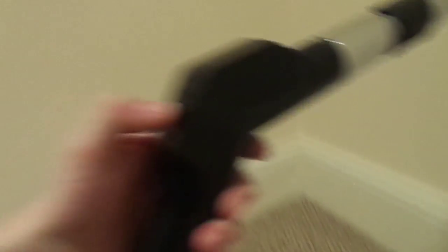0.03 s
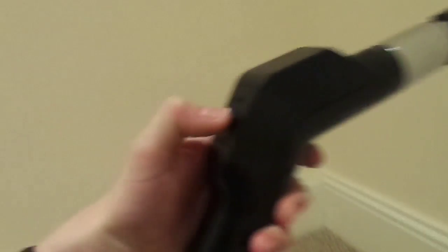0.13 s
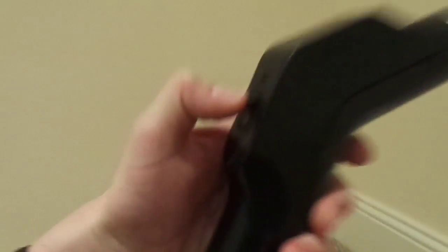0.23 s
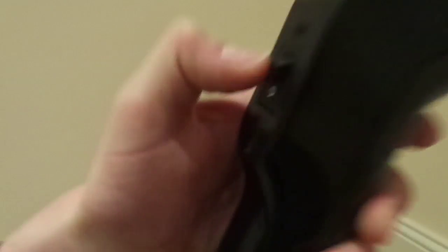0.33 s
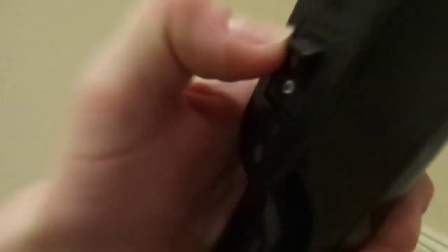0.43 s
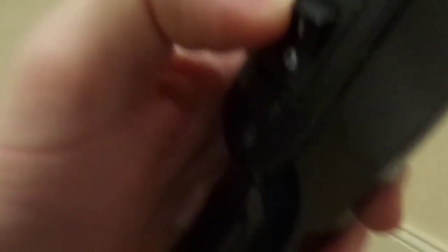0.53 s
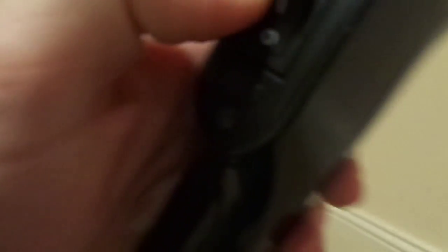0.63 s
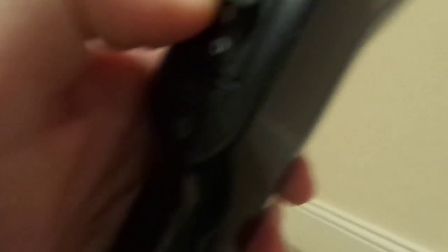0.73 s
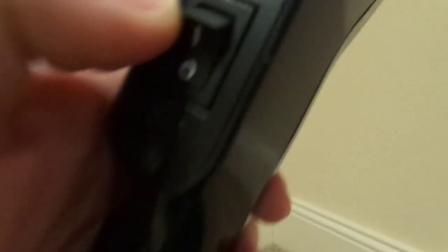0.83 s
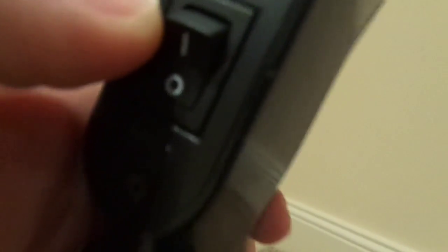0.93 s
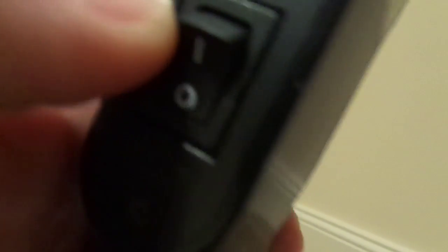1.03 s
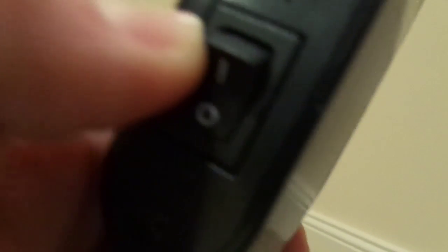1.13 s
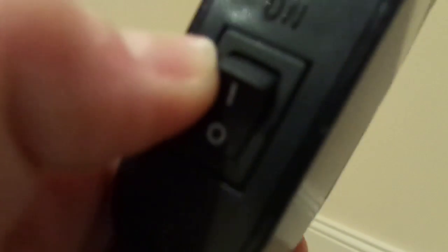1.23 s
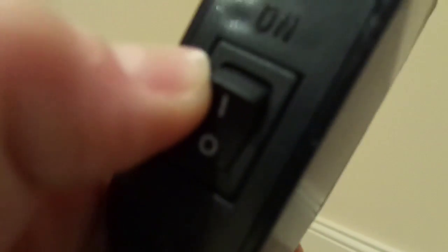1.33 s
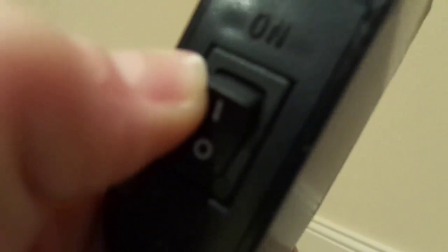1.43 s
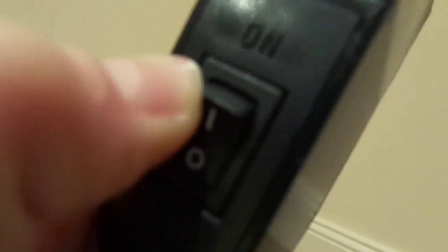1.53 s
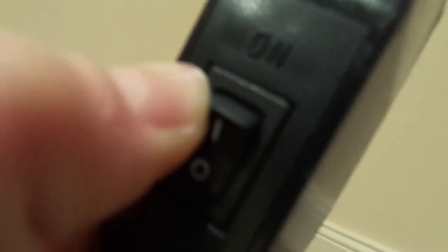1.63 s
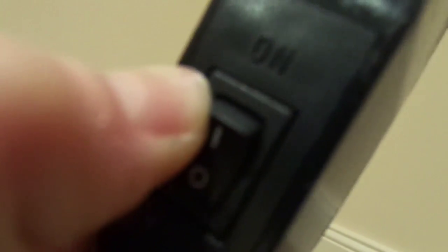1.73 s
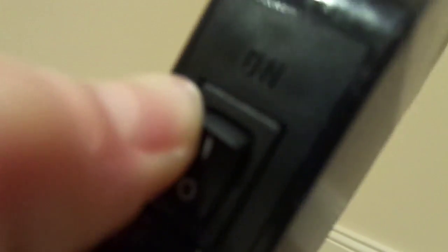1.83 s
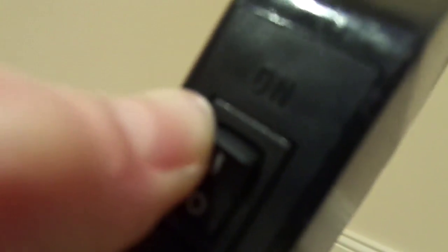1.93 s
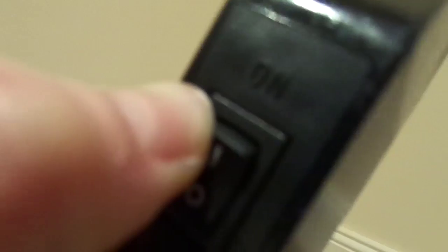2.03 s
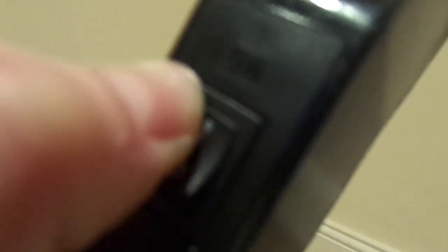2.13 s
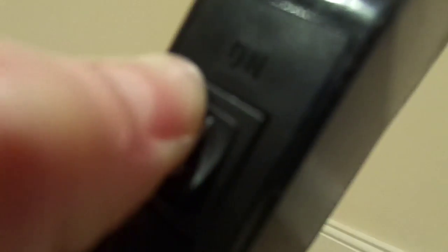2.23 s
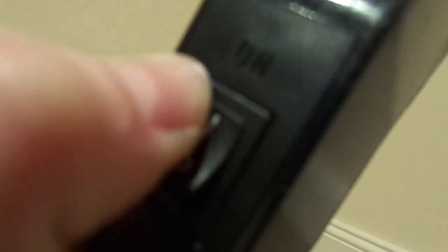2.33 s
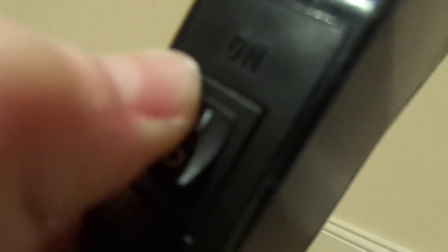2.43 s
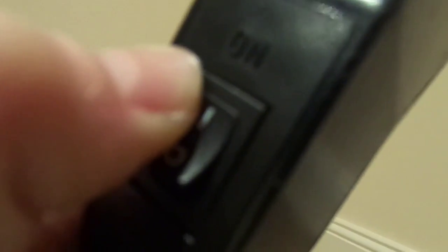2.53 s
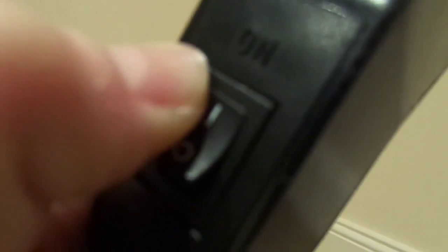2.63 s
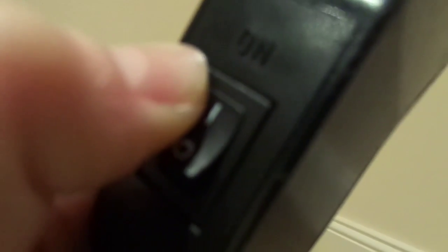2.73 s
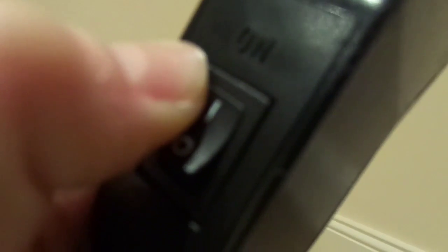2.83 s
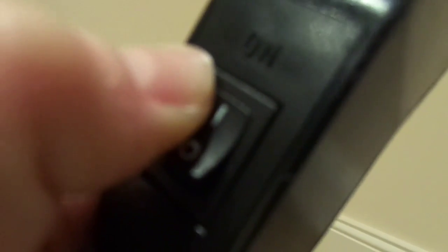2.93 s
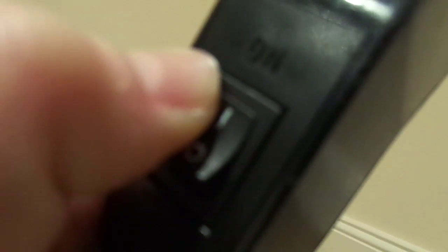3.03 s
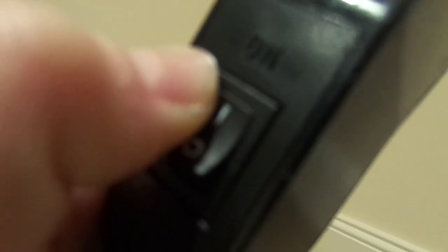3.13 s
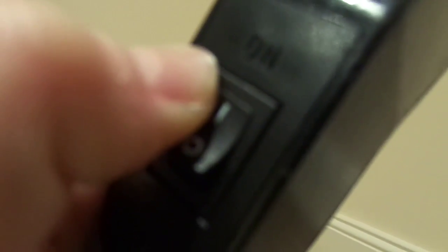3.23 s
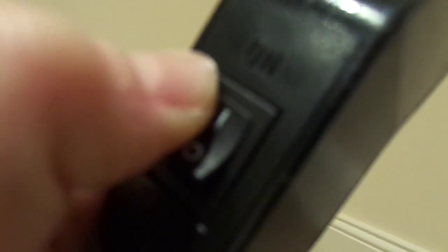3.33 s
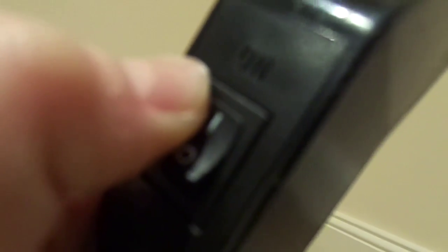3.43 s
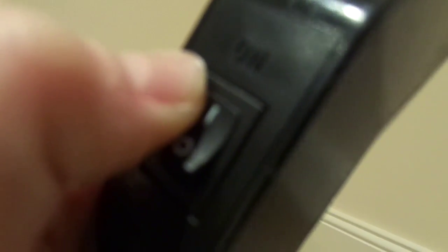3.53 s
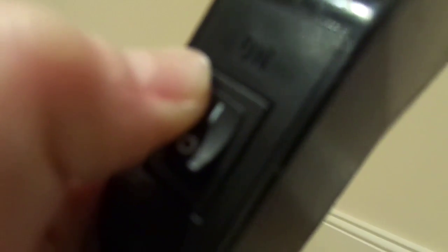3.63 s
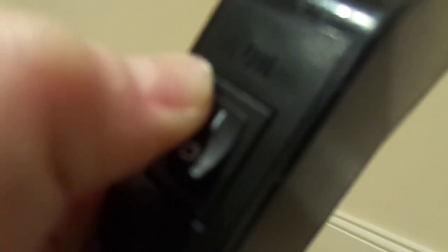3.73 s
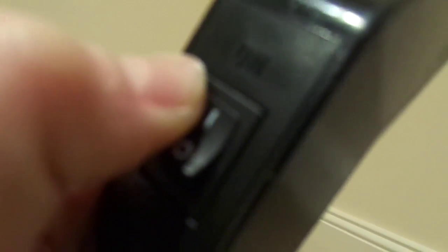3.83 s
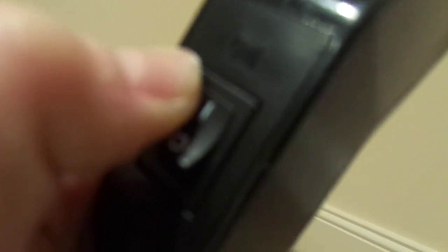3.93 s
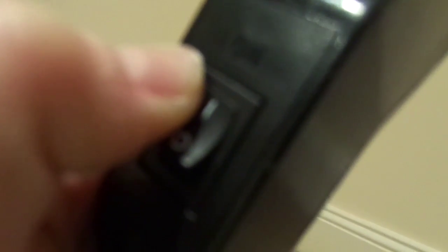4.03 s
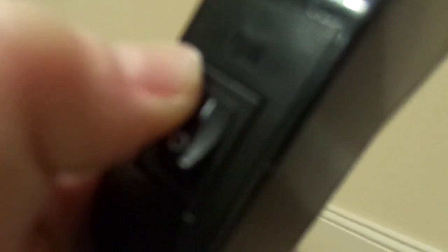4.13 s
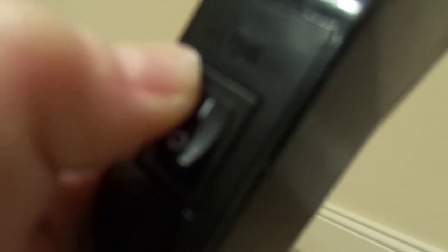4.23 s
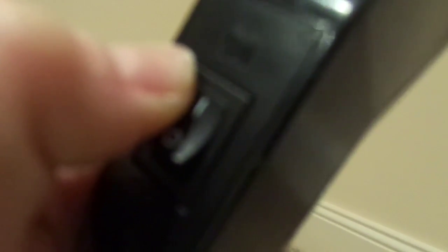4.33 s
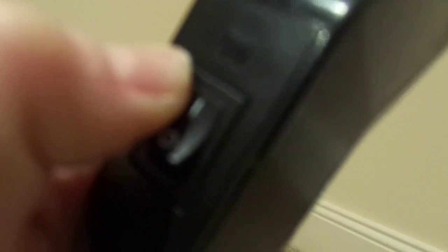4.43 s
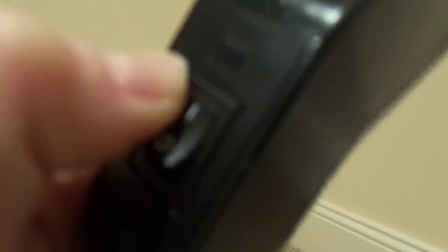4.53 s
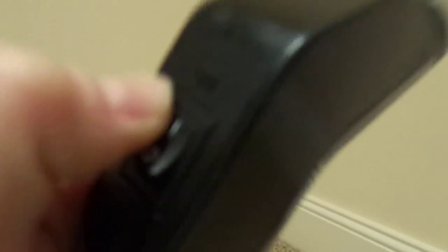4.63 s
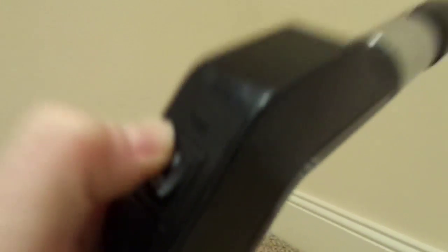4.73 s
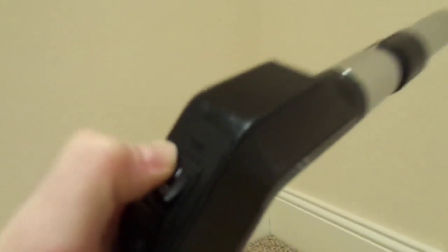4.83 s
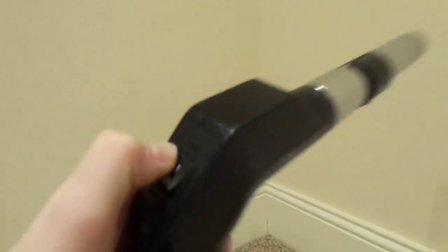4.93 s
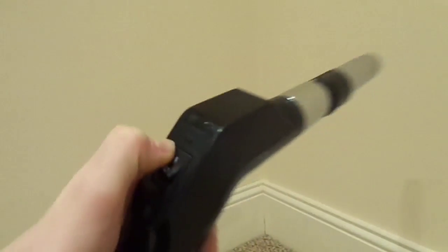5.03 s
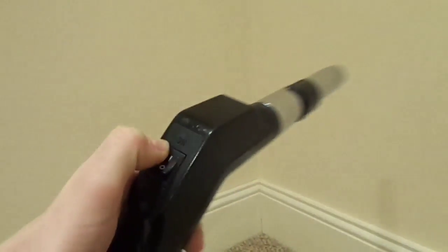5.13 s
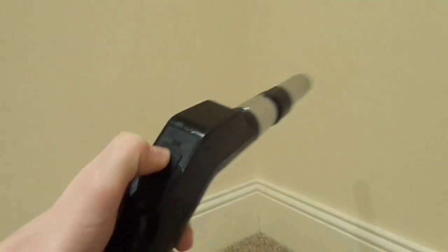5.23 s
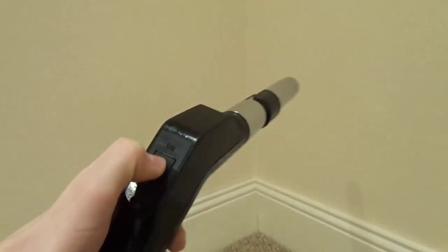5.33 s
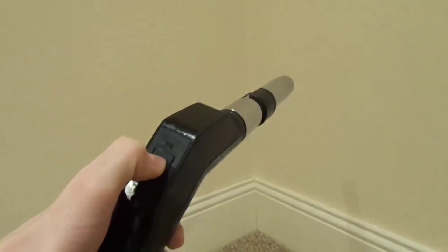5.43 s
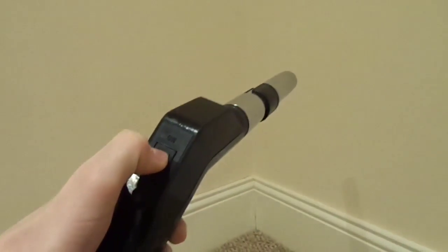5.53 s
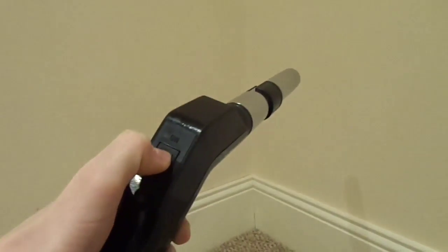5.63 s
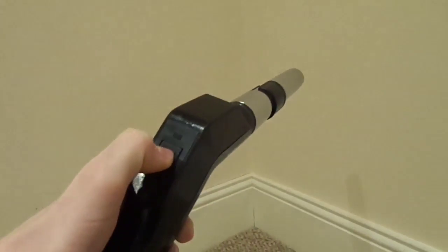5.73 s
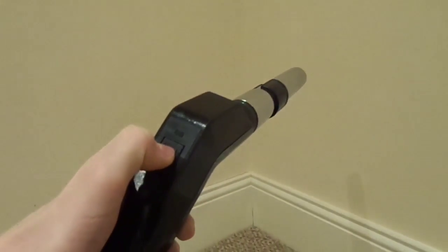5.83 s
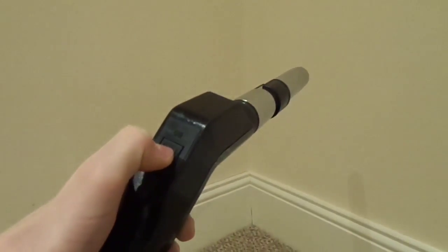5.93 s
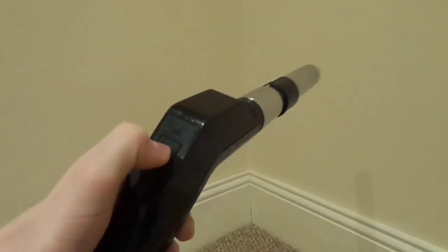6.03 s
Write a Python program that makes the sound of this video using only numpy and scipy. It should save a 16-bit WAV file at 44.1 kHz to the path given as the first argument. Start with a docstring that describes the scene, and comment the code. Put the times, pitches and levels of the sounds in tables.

```python
"""You hear a hose drag over carpet in a quiet room, a creaking plastic handle, a rocker switch, then rushing air.
A hand turns the handle of a central vacuum hose: the drag is noise, and small slips ring the shell.
The switch snaps with short noise bursts; the far-off motor spins up and air rushes into the wand.
The rush is noise coloured by hose modes, with near echoes.
The echoes shorten when the handle is moved away from the microphone."""
import sys
import numpy as np
from scipy import signal
from scipy.fft import rfft, irfft, next_fast_len
from scipy.io import wavfile
from scipy.ndimage import map_coordinates

SR = 44100
rng = np.random.default_rng(int(sys.argv[2]) if len(sys.argv) > 2 else 0)


def materialize(psi):
    """Save the field psi as 16-bit PCM at rate SR to the path in sys.argv[1].

    A 1-D psi becomes a single channel; in a 2-D psi each row is a channel.
    """
    bounded = np.clip(np.atleast_2d(psi).T, -1, 1)
    quanta = np.round(bounded * 32767).astype(np.int16)
    wavfile.write(sys.argv[1], SR, quanta)


N = 267951
SIZE = next_fast_len(N + SR // 2)   # room for filter tails
HZ = np.maximum(np.arange(SIZE // 2 + 1) * SR / SIZE, 1)   # frequency grid of the filters
TAIL_T60_S = 0.39   # time in which the room's sound falls by 60 dB


def air():
    """Turbulence at the inlet rings in the hose; nearby surfaces add delayed copies that comb the sound."""
    # noise spectra of the air layers: [f/Hz, level per Hz/dB]
    rush_spectrum = [(88, -33), (150, -10), (278, 0), (470, -7.5), (927, -1), (1120, -4), (1240, 1.5),
                     (1770, -4.5), (2010, -4), (4140, -2), (6000, -29), (7800, -20.5), (13200, -120)]
    hiss_spectrum = [(2940, -14), (5000, -2.5), (9750, -1.5), (13300, -0.5), (14800, -2.5)]
    rumble_spectrum = [(13, -52), (22, -27), (86, 11.5), (108, 11), (156, -1), (190, 4.5), (250, -25),
                       (420, -120)]
    # loudness of each layer: [near level/dB, far level/dB, power of the flow that it follows]
    rush_law = (-42, -45, 0.97)
    hiss_law = (-45.5, -48, 1.49)
    rumble_law = (-65.5, -61.5, 1.4)
    # hose and wand modes: [f/Hz, width/Hz, near lift/dB, far lift/dB]
    hose_modes = [(134, 30, -21, 11), (187, 25, 4.5, -6), (222.7, 6.1, 13, 9.5), (282.3, 6.4, 7, 9),
                  (316, 13, 4.5, 6), (358, 14.4, 10, 11.5), (432, 11.4, 8.5, 13.5), (492, 8.5, 9, 9.5),
                  (690, 280, 1.5, 4.5), (964, 94, 0, 3), (1305, 56, 1.5, 1.5), (1600, 91, 0, 0.5),
                  (2010, 200, 1.5, 6), (2495, 24, 1.5, 6), (2710, 40, 1.5, 7), (3296, 36, 7, 0),
                  (3590, 170, 0, 2.5), (4170, 150, -1.5, -1), (4596, 200, 4, 4)]
    # tone of slow air: [f/Hz, gain/dB]
    slow_flow_colour = [(150, -7), (500, -1), (2500, 1), (3500, -3.5), (5000, -6)]
    # tone of the sound bounced off a surface: [f/Hz, gain/dB]
    echo_colour = [(300, -15), (1200, -13), (3000, -11.5), (5000, -7), (8000, -15.5), (13000, -11)]
    # softer surfaces return less treble: [f/Hz, gain/dB]
    later_dull = [(3000, 2), (8000, -9)]
    # later echoes: [near extra path/ms, far extra path/ms, near gain/dB, far gain/dB]
    later_echoes = [(3.16, 2.16, -11, -5.5), (4.02, 3.05, -8.5, -6.5)]

    # The suction arrives, then builds with this time constant.
    air_start_s, spin_up_s = 2.327, 0.51
    since = np.maximum(np.arange(N) / SR - air_start_s, 0)
    flow = 1 - np.exp(-since / spin_up_s)
    far = ramp(4.55, 5.24)   # the handle is carried away

    def near_to_far(near, distant):
        """Slide from the near value to the far one as the handle moves."""
        return near + far * (distant - near)

    rush_gain, hiss_gain, rumble_gain = [from_db(near_to_far(near_db, far_db)) * flow ** power
                                         for near_db, far_db, power in (rush_law, hiss_law, rumble_law)]

    raw = noise(rush_spectrum)
    near_lift, far_lift = [sum(row[k] / (1 + ((HZ - row[0]) / row[1] * 2) ** 2) for row in hose_modes)
                           for k in (2, 3)]
    rush = (1 - far) * rms_one(colour(raw, near_lift)) + far * rms_one(colour(raw, far_lift))
    dull_fades_s = 0.45   # time constant of the dull share
    slow = np.exp(-since / dull_fades_s)
    rush = (1 - slow) * rush + slow * colour(rush, at_hz(slow_flow_colour))

    # The inlet whistles breathily around one share of the flow; a weaker part grows with the flow and stays.
    whistle_hz, whistle_t60_s = 2560, 0.011
    whistle_flow, whistle_flow_span = 0.4, 0.21
    passing = from_db(-57.5) * np.exp(-((flow - whistle_flow) / whistle_flow_span) ** 2)
    staying = from_db(-64.5) * flow
    whistle = rms_one(ring(rng.standard_normal(N), whistle_hz, whistle_t60_s))
    whistle = (passing + staying) * (since > 0) * whistle

    # Random drifts, in dB, make the rush and hiss flutter.
    rush = rush_gain * from_db(0.77 * drift(23)) * rush
    hiss = hiss_gain * from_db(0.46 * drift(15)) * noise(hiss_spectrum)
    inlet = rush + hiss + whistle

    bounced = colour(inlet, at_hz(echo_colour))
    echo_near_ms, echo_far_ms = 1.92, 1.48   # extra path of the first echo before the settling
    settle_ms = 0.06 * ramp(5.55, 5.95)   # the hand drifts a little further
    far_echo_db = -1.5
    echoes = from_db(far_echo_db * far) * delayed(bounced, near_to_far(echo_near_ms, echo_far_ms) - settle_ms)
    dull = colour(bounced, at_hz(later_dull))
    for near_ms, far_ms, near_db, far_db in later_echoes:
        echoes += from_db(near_to_far(near_db, far_db)) * delayed(dull, near_to_far(near_ms, far_ms))
    return inlet + echoes + rumble_gain * noise(rumble_spectrum)


def snaps():
    """The spring throws the rocker over: dry broadband cracks, each a noise burst filtered by the switch body."""
    # rocker cracks: [t/s, peak level before the bass cut/dB, brightness/dB per octave, burst decay/ms]
    crack_list = [(2.1063, -30, -1, .8), (2.109, -27, 0, 1.1), (2.1177, -11.5, 1, .7), (2.121, -25, 0, 2.2),
                  (2.129, -37, 0, .8), (2.175, -39, -2, .6)]
    # tone of the rocker: [f/Hz, level per Hz/dB]
    rocker_colour = [(800, -30), (1400, 0), (2800, 0), (3600, -6), (4300, 0), (5300, -8), (6400, -1),
                     (7800, -3), (9500, 0), (12000, -3), (14800, -2), (16000, -30)]
    out = np.zeros(N)
    hz = np.maximum(np.arange(129) * SR / 256, 1)
    body_db = np.interp(np.log(hz), np.log(np.array(rocker_colour)[:, 0]), np.array(rocker_colour)[:, 1])
    for s, peak_db, tilt_db, ms in crack_list:
        tilt = tilt_db * np.log2(np.maximum(hz, 1000) / 5000)   # flat below 1000 Hz
        # Shift the filter so that its first half is not lost, then drop the delay.
        body = np.roll(irfft(from_db(body_db + tilt)), 20)
        add(out, np.convolve(burst(ms), body[:128])[20:], s, peak_db)
    return out


def snap_wash(x):
    """The walls return the cracks from all sides at once: smooth noise whose power follows theirs and dies away."""
    # noise spectrum of the wash: [f/Hz, level per Hz/dB]
    wash_spectrum = [(900, -42), (1500, -2), (2200, -1), (3500, -5), (5500, -5), (9000, 3), (12000, -4),
                     (15000, -8)]
    wash_db = -15   # against the cracks
    decay = from_db(-120 * np.arange(SR // 2) / SR / TAIL_T60_S)   # a power, so twice the dB
    power = signal.fftconvolve(x ** 2, decay / decay.sum())[:N]
    return from_db(wash_db) * np.sqrt(np.maximum(power, 0)) * noise(wash_spectrum)


def thump():
    """The dull knock of the rocker landing: one click rings one low, quickly damped mode."""
    click = np.arange(N) == round(2.1177 * SR)
    return from_db(-46) * ring(click, hz=330, t60=.008)


def creaks():
    """Single slips of the shell, a fine random crackle while the grip tightens, and thumbnail taps on the rocker."""
    # creaks: [t/s, peak level before the bass cut/dB, hollow note/dB, treble/dB]
    creak_list = [(.6408, -39, -18, -12), (.6545, -51, -25, 0), (.671, -48, -20, -20), (.7, -40, -10, -4),
                  (.705, -46, 14, -8), (.721, -44, -20, -7), (.7378, -45, -20, -20), (.7505, -47, -10, -15),
                  (.756, -48, 9, -17), (.7617, -39, -10, -12), (.7742, -42, -15, -8), (.7923, -38, -16, -8),
                  (.8005, -40, -18, -9), (.8165, -41, -12, -20), (.8315, -43, -16, -10),
                  (.8418, -37.5, -20, -8), (.853, -40, -15, -14), (.871, -52, -10, 6)]
    # thumbnail taps: [t/s, peak level before the bass cut/dB]
    tap_list = [(1.3163, -27), (1.4175, -54), (2.1748, -31)]
    # modes that a tap sets ringing: [f/Hz, level/dB, time to fall 60 dB/s]
    tap_modes = [(1432, 0, .015), (2200, -1, .011), (3000, -1, .010), (3900, 0, .009), (4800, -3, .008),
                 (6200, -10, .006)]
    slip_ms = 1.7   # decay of each slip
    grip_per_s, grip_db = 1200, -58   # crackle grains per second; their level before the bass cut

    grains = (rng.random(N) < grip_per_s / SR) * rng.standard_normal(N)
    grip_start_s, grip_end_s, grip_edge_s = .75, .85, .015
    grip = ramp(grip_start_s, grip_start_s + grip_edge_s) - ramp(grip_end_s, grip_end_s + grip_edge_s)
    out = from_db(grip_db) * grip * rms_one(shell(grains, hollow_db=-14, treble_db=-14))

    for s, peak_db, hollow_db, treble_db in creak_list:
        add(out, shell(burst(slip_ms), hollow_db, treble_db), s, peak_db)

    nail = np.pad(np.hanning(7), (0, SR // 20))   # a soft push, then silence to ring in
    # Neighbouring modes start with opposite signs.
    tap = sum((-1) ** k * from_db(db) * ring(nail, hz, t60) for k, (hz, db, t60) in enumerate(tap_modes))
    for s, peak_db in tap_list:
        add(out, tap, s, peak_db)
    return out


def shell(slips, hollow_db, treble_db):
    """Slips ring the handle's modes; the hollow note and the treble depend on where the grip acts."""
    # plastic handle modes: [f/Hz, level/dB, time to fall 60 dB/s]
    shell_modes = [(1430, 0, .03), (2200, -3, .009), (2900, 0, .014), (3300, -3, .011), (4500, -6, .008),
                   (5200, -13, .006), (8200, -1, .006), (11500, -1, .005), (13200, -3, .004)]
    spread = rng.normal(0, 1.5, len(shell_modes))   # random dB for each mode
    out = 0
    for (hz, db, t60), extra_db in zip(shell_modes, spread):
        level_db = db + extra_db + hollow_db * (hz < 1800) + treble_db * (hz > 7000)
        out = out + from_db(level_db) * ring(slips, hz, t60)
    return out


def room(x):
    """The room answers each click with a smooth wash of noise that dies away."""
    # tone of the wash: [f/Hz, gain/dB]
    tail_colour = [(1000, -3), (2000, 0), (3500, -8.5), (6000, -15), (9000, -4), (14000, -6)]
    tail_db = -11   # added to the tone
    t = np.arange(SR // 2) / SR
    wash = rng.standard_normal(len(t)) * from_db(-60 * t / TAIL_T60_S) * np.clip(t / 0.0014, 0, 1)
    wash = wash / np.sqrt(np.sum(wash ** 2))
    return colour(signal.fftconvolve(x, wash)[:N], tail_db + at_hz(tail_colour))


def drag():
    """The hose drags on the carpet: dense, lumpy friction noise, brighter when pulled harder, with two catches."""
    # strength of the drag: [t/s, level/dB]
    drag_levels = [(0, -55), (.04, -62), (.15, -58.5), (.32, -52), (.43, -57), (.5, -65.5), (.6, -71),
                   (.75, -61), (1.1, -67), (1.5, -76)]
    # noise spectra of the friction: [f/Hz, level per Hz/dB]
    body_spectrum = [(120, -33), (200, -13), (431, -5), (534, -2.5), (741, -10), (807, -5.5), (1090, -6.5),
                     (1290, -12), (1410, -5.5), (2060, -8), (2220, -4), (2550, -7), (6000, -19.5),
                     (7800, -39), (13200, -120)]
    bright_spectrum = [(2940, -34), (5000, -19), (6990, -5), (10000, -3), (11100, 0), (12500, 1),
                       (15000, -8.5)]
    # hose ribs catching on the pile: [t/s, peak level/dB, burst decay/ms]
    catches = [(.1992, -39, 1.3), (0.319, -35, 2.8)]

    body_db, = in_time(drag_levels)
    # Treble level at the strongest pull; it swings 1.3 dB for each dB of the drag.
    bright_db = -56.5 + 1.3 * (body_db - body_db.max())
    fade = np.clip((drag_levels[-1][0] - np.arange(N) / SR) / 0.075, 0, 1)
    rub = rms_one(ring(rng.standard_normal(N), hz=2280, t60=.02))   # a narrow ring in the friction
    body = noise(body_spectrum) + from_db(-11) * rub
    lumps = from_db(1.1 * drift(21))
    out = fade * lumps * (from_db(body_db) * body + from_db(bright_db) * noise(bright_spectrum))

    catch_band = signal.butter(3, [450, 3600], "band", fs=SR, output="sos")
    for s, peak_db, ms in catches:
        add(out, signal.sosfilt(catch_band, burst(ms)), s, peak_db)
    return out


def background():
    """Room and microphone noise, a faint whine of ringing noise, and a low hum once the switch closes."""
    # noise spectrum of the quiet room: [f/Hz, level per Hz/dB]
    quiet_spectrum = [(13, -27), (36, -9), (47, 5.5), (58, -5), (71, -6.5), (130, -13), (218, -1.5),
                      (243, -6), (328, -2), (397, -6), (877, -5), (1560, -9.5), (1780, -4), (1940, -9),
                      (2840, -14), (15000, -18)]
    quiet_db, whine_db, hum_db = -65.5, -79.5, -79
    hum_hz, hum_start_s, hum_rise_s = 99, 2.15, 0.072
    t = np.arange(N) / SR
    whine = from_db(whine_db) * rms_one(ring(rng.standard_normal(N), hz=1850, t60=.25))
    # The phase of the hum wanders a little.
    tone = np.sqrt(2) * np.sin(2 * np.pi * hum_hz * t + .5 * drift(2.8))
    hum = from_db(hum_db) * ramp(hum_start_s, hum_start_s + hum_rise_s) * tone
    return from_db(quiet_db) * noise(quiet_spectrum) + whine + hum


def burst(ms):
    """A quickly swelling, dying spray of micro-slips; ms is its decay time constant."""
    t = np.arange(SR // 20) / (ms * SR / 1000)   # counted in decay times
    return rng.standard_normal(len(t)) * np.minimum(t * 3 + .1, 1) * np.exp(-t)


def add(out, hit, s, peak_db):
    """Lay a hit down at its time and peak level."""
    at = round(s * SR)
    out[at:at + len(hit)] += from_db(peak_db) * hit / np.max(np.abs(hit))


def ring(clicks, hz, t60):
    """A unit click sets a dying sine of starting height 1 ringing; it falls 60 dB in t60 seconds."""
    r, w = from_db(-60 / (t60 * SR)), 2 * np.pi * hz / SR
    # The tiny offset keeps the filter clear of extremely small numbers.
    return signal.lfilter([0, np.sin(w)], [1, -2 * r * np.cos(w), r * r], clicks + 1e-18)


def noise(spectrum):
    """Steady noise of a given spectrum, rms 1."""
    return rms_one(colour(rng.standard_normal(N), at_hz(spectrum)))


def colour(x, db):
    """Filter by a dB value for every grid frequency."""
    return irfft(rfft(x, SIZE) * from_db(db), SIZE)[..., :N]


def at_hz(points):
    """A table of f/Hz and dB, read on the whole frequency grid."""
    return np.interp(np.log(HZ), np.log(np.array(points)[:, 0]), np.array(points)[:, 1])


def drift(rate):
    """Slow random wander of rms 1: noise smoothed by two equal low-pass stages at rate Hz."""
    r = np.exp(-80 * np.pi * rate / SR)   # computed at every 40th sample
    slow = signal.lfilter([1], [1, -2 * r, r * r], rng.standard_normal(N // 40 + 2002))[2000:]
    return np.interp(np.arange(N) / 40, np.arange(len(slow)), rms_one(slow))


def delayed(x, ms):
    """Read a sound through a moving delay."""
    return map_coordinates(x, [np.arange(N) - ms * SR / 1000], order=3)


def ramp(start_s, end_s):
    """Smooth step from 0 to 1."""
    u = np.clip((np.arange(N) / SR - start_s) / (end_s - start_s), 0, 1)
    return u * u * (3 - 2 * u)


def in_time(rows):
    """Each column after the time as a curve over all samples."""
    s, *columns = np.transpose(rows)
    return [np.interp(np.arange(N) / SR, s, c) for c in columns]


def from_db(db):
    """Decibels to gain."""
    return 10 ** (np.asarray(db) / 20)


def rms_one(x):
    """Scaled to rms 1."""
    return x / np.sqrt(np.mean(x ** 2) + 1e-20)


def scene():
    """All sources reach one spot in the middle; the small handle radiates little bass."""
    bass_cut = signal.butter(4, 1100, "high", fs=SR, output="sos")
    shell_clicks, cracks = signal.sosfilt(bass_cut, [creaks(), snaps()])
    switch = cracks + snap_wash(cracks) + thump()
    handle = shell_clicks + room(shell_clicks)
    mid = air() + switch + handle + drag() + background()
    return np.stack([mid, mid])


def record(dry):
    """One microphone, weak in the deep bass, feeds both channels; the top is cut steeply."""
    mic_bass_hz, cutoff_hz = 33.5, 15020
    thin = signal.sosfilt(signal.butter(3, mic_bass_hz, "high", fs=SR, output="sos"), dry)
    return signal.sosfilt(signal.ellip(12, .5, 60, cutoff_hz, fs=SR, output="sos"), thin)


dry = scene()
out = record(dry)
materialize(out)
```